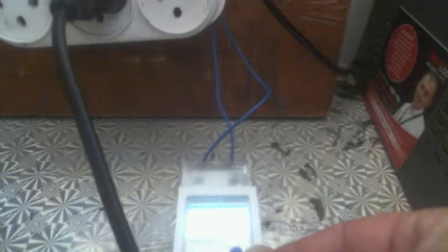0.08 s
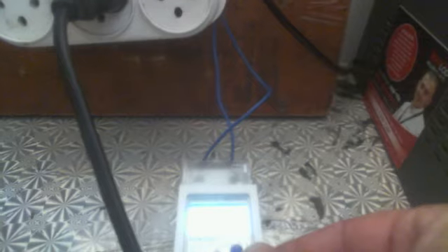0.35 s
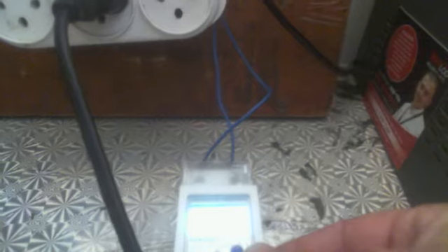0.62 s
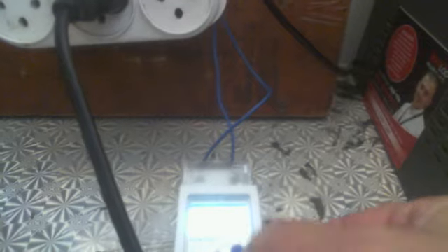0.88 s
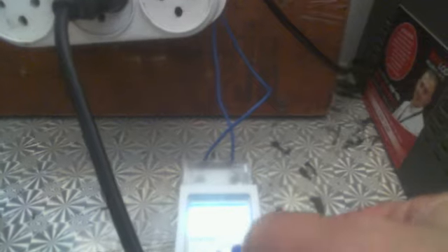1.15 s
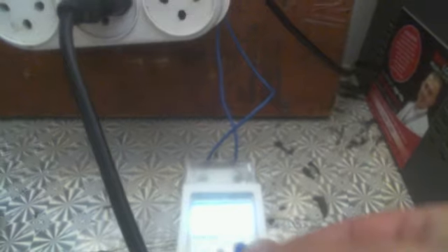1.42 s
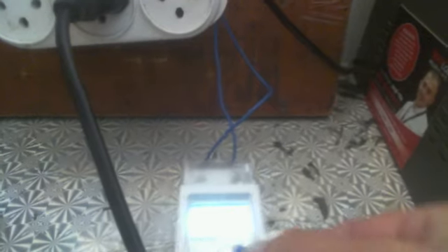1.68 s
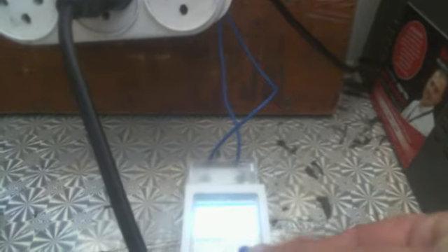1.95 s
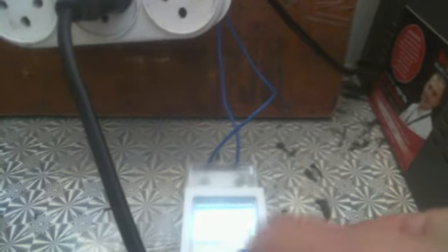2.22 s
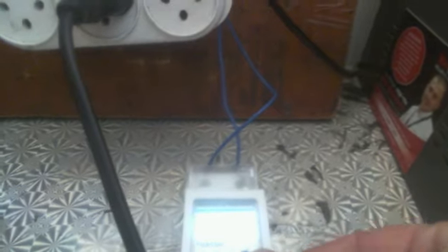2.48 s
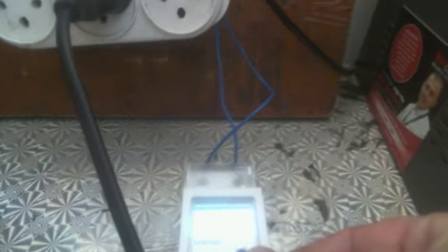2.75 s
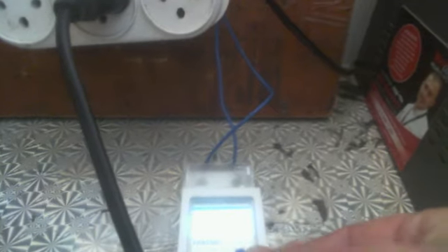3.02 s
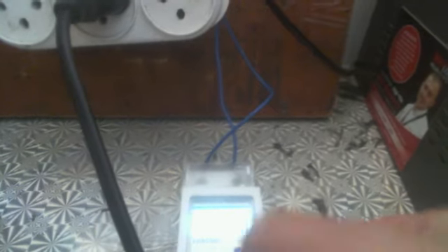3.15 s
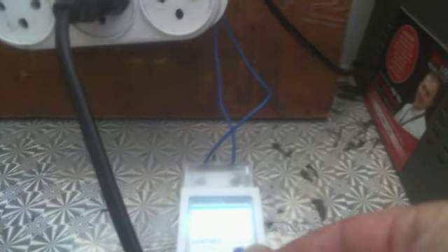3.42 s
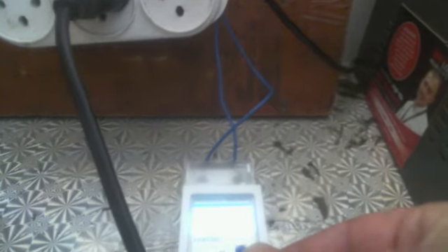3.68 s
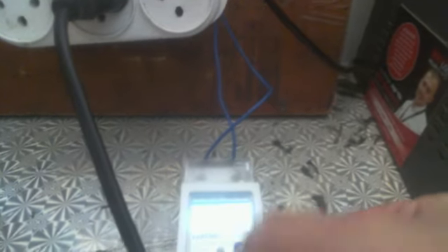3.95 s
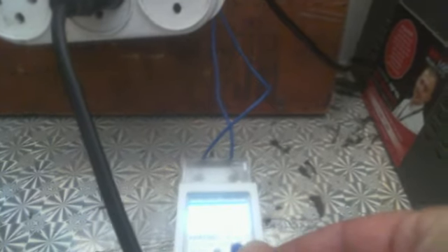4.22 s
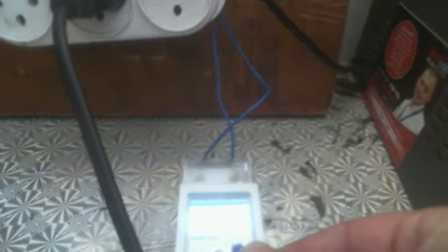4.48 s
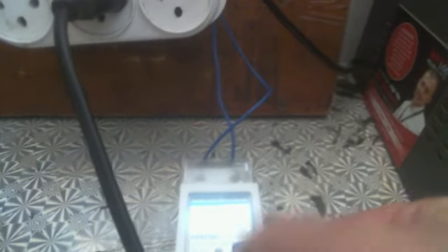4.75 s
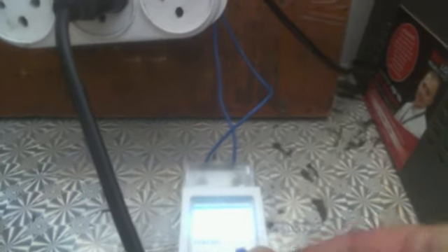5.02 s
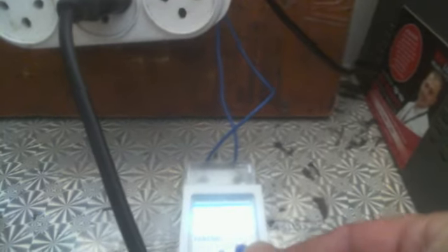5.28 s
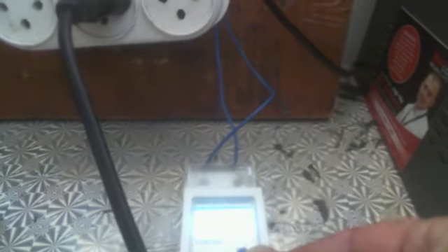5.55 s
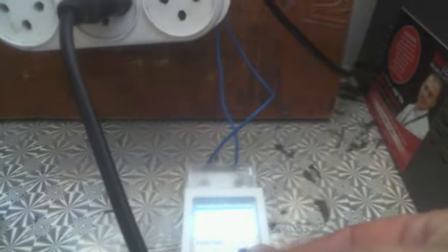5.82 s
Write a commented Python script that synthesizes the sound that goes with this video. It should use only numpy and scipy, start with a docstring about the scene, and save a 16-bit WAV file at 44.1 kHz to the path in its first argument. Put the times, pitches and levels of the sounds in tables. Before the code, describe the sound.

A steady low electrical hum and soft hiss fill a small room throughout, with a faint, thin high whine that breaks off briefly about seven times a second. At about 0.8 seconds a hand bumps the close, hand-held microphone, making a low thump and rumble that settle by about 1.4 seconds. At 1.8 seconds a small meter knocks softly and dully against the floor. Its plastic button is then pressed four times, at about 2.2, 3.2, 4.0 and 4.8 seconds. Each press is a short, bright click, followed roughly a fifth of a second later by a louder, slightly rounder snap as the button springs back. These clicks are the most prominent sounds, crisp and close with only a little room echo. A faint rumble of shifting grip passes around 3 seconds, and a last, softer microphone bump comes at about 5.6 seconds.

```python
"""A small energy meter is clicked close to a hand-held camera in a small room. From the start there is
a steady low hum, hiss, and a thin electronic whine that pauses at a regular beat. Near 1 s the hand bumps
the camera; at 1.8 s the finger knocks the meter against the floor. From 2.2 to 5.1 s it clicks the plastic
button four times: each press and release snaps the switch and rings the modes of the case.
A last, softer bump of the camera follows at 5.6 s."""
import sys
import numpy as np
from scipy import signal
from scipy.fft import rfft, irfft, next_fast_len
from scipy.io import wavfile
from scipy.ndimage import map_coordinates

SR = 44100
rng = np.random.default_rng(int(sys.argv[2]) if len(sys.argv) > 2 else 0)


def wrap_up_sound(samples):
    """Save the sound to the file named by the first command line argument, as 16-bit audio."""
    columns = np.atleast_2d(samples).T
    # keep every value between -1 and 1, then stretch to whole-number steps
    tamed = np.clip(columns, -1, 1)
    steps = np.round(tamed * 32767).astype(np.int16)
    wavfile.write(sys.argv[1], SR, steps)


N = 257852

# the switch snaps in: start_s, level_db
PRESSES = [(2.1936, -17.5), (3.204, -17.5), (4.0307, -17.5), (4.8481, -18)]
# the switch springs back: start_s, level_db
RELEASES = [(2.4397, -11), (3.4196, -9), (4.2259, -9), (5.0630, -9)]
# the fingertip touches the button lightly: start_s, level_db
TOUCHES = [(1.8335, -49.5), (2.3975, -43)]
# modes of the plastic case: pitch_hz, t60_s, press_db, release_db
CASE_MODES = [(450, 0.017, -16, -24.5), (719.3, 0.0201, -20.5, -20.5), (1094, 0.0338, -21, -27),
              (1460.7, 0.14, -66, -36.5), (1736, 0.0197, -47, -21.5), (2030.4, 0.0191, -22.5, -22),
              (2335.6, 0.01312, -3.5, -1), (2755.3, 0.0282, -8.5, -17.5), (3377, 0.00826, 2.5, -28.5),
              (3453, 0.0254, -6, -21), (3847.7, 0.0123, 6, 5.5), (4432, 0.0131, -0.5, -19),
              (4967, 0.01114, -1, -7), (6409, 0.012, 6, -5.5), (7150, 0.01, 2, -22.5),
              (8387, 0.0233, -11, -14.5), (8606, 0.01735, -12, -10.5), (9435, 0.0127, -10, -24.5),
              (12013, 0.0137, -10.5, -28), (13560, 0.0104, -9, -16.5)]
def button():
    """Impact excitation: press and release weight the same modes differently, one bright, one rounder."""
    going_in = [(hz, t60, db) for hz, t60, db, _ in CASE_MODES]
    coming_back = [(hz, t60, db) for hz, t60, _, db in CASE_MODES]
    press = snaps(PRESSES, going_in, rise_s=0.001784, travel_s=0.00415, damp_db=-5,
                  crack_db=-3.0, crack_t60=0.018, cutoff_hz=16100, near_db=-7.5, room_db=-16.5)
    release = snaps(RELEASES, coming_back, rise_s=0.002421, travel_s=0.00396, damp_db=-5,
                    crack_db=-4.0, crack_t60=0.01079, cutoff_hz=4430, near_db=-4.5, room_db=-15.5)
    touch = snaps(TOUCHES, coming_back, rise_s=0.00206, travel_s=0.0056, damp_db=-7,
                  crack_db=-0.5, crack_t60=0.0292, cutoff_hz=5000, near_db=-10.5, room_db=-3.5)
    return press + release + touch


# spectrum of the contact noise: frequency_hz, relative_density_db
CRACK_SPECTRUM = [(200, -25), (500, -22.5), (1050, -22), (1450, -16.5), (1850, -17), (2350, -6), (3100, -9),
                  (3800, -1.5), (5300, -9.5), (6600, -5.5), (8500, -15), (10000, -11), (13800, -22),
                  (16000, -25.5)]
def snaps(events, modes, rise_s, travel_s, damp_db, crack_db, crack_t60, cutoff_hz, near_db, room_db):
    """Snap-through buckling: ring and crack swell as the switch dome flips and are damped as it seats."""
    track, t = np.zeros(N), np.arange(SR // 3) / SR
    seated = 1 - 1 / (1 + (t / travel_s) ** 10)
    swell = (1 - np.exp(-(t / rise_s) ** 2)) * amp(damp_db * seated)

    def contact_noise():
        """Low-pass filtering: a short burst of contact noise, its treble rolled off above cutoff_hz."""
        burst = filtered(noise(CRACK_SPECTRUM, size=len(t)), lambda hz: 1 / np.hypot(1, hz / cutoff_hz))
        return unit(burst) * fade(t, crack_t60) * swell

    texture = contact_noise()  # the same parts meet in a similar way each time
    for start_s, db in events:
        crack = amp(crack_db) * (texture + 0.304 * contact_noise())
        ring = case_ring(modes, t) * swell
        sideways = 0.274 * ring + contact_noise()  # to the sides the case radiates a broader colour
        add(track, start_s, amp(db) * (ring + crack + reflections(sideways, near_db, room_db)))
    return track


def case_ring(modes, t, vary_db=2.0):
    """Modal superposition: the case rings as damped sines whose strengths vary from blow to blow."""
    hz, t60, db = np.transpose(modes)[:, :, None]
    strength = amp(db + vary_db * rng.standard_normal(hz.shape))
    sign = (-1) ** np.arange(len(hz))[:, None]  # neighbouring modes swing opposite ways
    return np.sum(sign * strength * np.sin(2 * np.pi * hz * t) * fade(t, t60), axis=0)


# the meter meets the floor: start_s, level_db
KNOCKS = [(1.8335, -34.5), (1.876, -47)]
# modes of the meter on the floor: pitch_hz, t60_s, level_db
FLOOR_MODES = [(214, 0.0935, 3), (287, 0.042, 1.5), (485, 0.039, -2.5), (594, 0.0191, 3.5),
               (760, 0.018, -23)]
def knocks(contact_s=0.001):
    """Damped free vibration: the meter rocks under the finger and thuds dully on the floor."""
    track, t = np.zeros(N), np.arange(SR // 3) / SR
    ring = sum(amp(db) * np.sin(2 * np.pi * hz * t) * fade(t, t60) for hz, t60, db in FLOOR_MODES)
    thud = ring * (1 - np.exp(-t / contact_s))
    for start_s, db in KNOCKS:
        add(track, start_s, amp(db) * (thud + reflections(thud, near_db=-12.5, room_db=-18.5)))
    return track


# shifts of grip, each length taken between its -20 dB points: peak_s, level_db, length_s
GRIP_SHIFTS = [(0.855, -26, 0.3424), (1.267, -38, 0.37), (2.99, -42.5, 0.01), (3.131, -43, 0.31),
               (3.886, -51.5, 1.06), (5.534, -44.5, 0.99)]
# bumps of the hand on the camera: peak_s, level_db, half_width_s
BUMPS = [(0.843, -21.5, 0.00186), (0.998, -34.5, 0.0041), (1.052, -31, 0.0158), (5.556, -31.5, 0.00528)]
# spectrum of the hand's rumble: frequency_hz, relative_density_db
RUMBLE_SPECTRUM = [(12, 19), (25, 0), (60, 6), (80, -2.5), (180, -21), (300, -65.5), (600, -110)]
def handling(rest_db=-60, rise_share=0.294, shudder_hz=62.6, shudder_t60=0.143, shudder_db=-7.5):
    """Structure-borne sound: shifts of grip rumble; bumps shake the camera like a mass on a spring."""
    t = np.arange(N) / SR
    grip = amp(rest_db)
    for peak_s, db, length_s in GRIP_SHIFTS:
        from_peak = np.maximum((peak_s - t) / rise_share, (t - peak_s) / (1 - rise_share)) / length_s
        grip = grip + amp(db - 20 * from_peak)
    pushes = sum(amp(db) / (1 + ((t - peak_s) / half_width_s) ** 2) for peak_s, db, half_width_s in BUMPS)
    spring = np.cos(2 * np.pi * shudder_hz * t) * fade(t, shudder_t60) * 2 * np.pi * shudder_hz / SR
    shudder = amp(shudder_db) * signal.fftconvolve(pushes, spring)[:N]
    return grip * noise(RUMBLE_SPECTRUM) + pushes + shudder


# tones of the machines: pitch_hz, rms_db
HUM_TONES = [(120, -59), (150, -68.5), (199.5, -63.5), (250, -61), (275, -68.5), (349, -72.5), (503, -74),
             (750, -73.5), (1443, -81.5)]
# spectrum of the room noise: frequency_hz, relative_density_db
AIR_SPECTRUM = [(12, 7.5), (25, -12), (45, -28.5), (65, -28.5), (87, -24.5), (110, -21), (135, -22),
                (171, -19), (196, -17), (256, -18), (376, -28), (509, -14.5), (582, -22.5), (736, -24.5),
                (860, -25.5), (1050, -46.5), (2400, -120)]
def hum(waver_db=1.79, drift_rad=0.375):
    """Forced vibration: mains-driven machines drone in slightly unsteady tones over soft room noise."""
    tones, t = np.zeros(N), np.arange(N) / SR
    for hz, db in HUM_TONES:
        strength = amp(db + waver_db * wobble(4.946))
        phase = 2 * np.pi * (hz * t + rng.random()) + drift_rad * wobble(4.72)
        tones += strength * np.sin(phase)
    return np.sqrt(2) * tones + amp(-45.5) * noise(AIR_SPECTRUM)


# tones of the whine while it sounds: pitch_hz, rms_db
WHINE_TONES = [(6750, -69), (8001, -76), (11375, -84), (12629, -91), (13500, -78)]
# spectrum of the hiss: frequency_hz, relative_density_db
HISS_SPECTRUM = [(590, -36), (1000, -1.5), (1200, 0), (1320, -2.5), (1480, -2.5), (2940, -6), (3500, -2.5),
                 (5700, -8), (6550, -4.5), (7100, -7.5), (8070, -7.5), (10700, -12.5), (13900, -11.5),
                 (16000, -12)]
def electronics(cycle_s=0.13325, pause_s=0.0226, ramp_s=0.00215):
    """Amplitude gating: a thin whine stops briefly in every cycle of the circuit, over steady hiss."""
    t = np.arange(N) / SR
    from_pause_s = np.abs((t / cycle_s + .5) % 1 - .5) * cycle_s
    gate = np.clip((from_pause_s - pause_s / 2) / ramp_s, 0, 1)
    whine = sum(amp(db) * np.sin(2 * np.pi * (hz * t + rng.random())) for hz, db in WHINE_TONES)
    return np.sqrt(2) * gate * whine + amp(-61.5) * noise(HISS_SPECTRUM)


# decay of reflections from the floor and furniture close by: frequency_hz, t60_s
NEAR_DECAY = [(500, 0.228), (2000, 0.053), (4000, 0.022), (7000, 0.0198), (12000, 0.0073)]
# decay of the room: frequency_hz, t60_s
ROOM_DECAY = [(300, 0.83), (3500, 0.215), (7000, 0.222), (13000, 0.102)]
def reflections(x, near_db, room_db):
    """Early reflections and reverberation: nearby surfaces answer first, then the room."""
    near = amp(near_db) * echoes(x, NEAR_DECAY, delay_s=0.003)
    room = amp(room_db) * echoes(x, ROOM_DECAY, delay_s=0.0052)
    return near + room


def echoes(x, decay, delay_s):
    """Diffuse field: x is convolved with a delayed noise tail, each frequency dying at its own rate."""
    hz, t, bands = signal.stft(rng.standard_normal(SR // 3), SR, nperseg=128)
    tail = signal.istft(bands * fade(t, along(decay, hz)[:, None]), SR, nperseg=128)[1]
    tail = np.pad(tail, (round(delay_s * SR), 0))
    return signal.fftconvolve(x, tail / np.linalg.norm(tail))[:len(x)]


def amp(db):
    """Decibels to amplitude gain."""
    return 10 ** (np.asarray(db) / 20)


def unit(x):
    """Normalisation to rms 1."""
    return x / np.sqrt(np.mean(x ** 2) + 1e-20)


def along(points, hz):
    """Interpolation of (frequency_hz, value) points on a log frequency axis."""
    frequencies, values = np.transpose(points)
    return np.interp(np.log(hz + 1), np.log(frequencies + 1), values)


def filtered(x, response):
    """Linear filtering: the spectrum of x times a frequency response."""
    size = next_fast_len(len(x) + SR // 4)
    return irfft(rfft(x, size) * response(np.fft.rfftfreq(size, 1 / SR)), size)[:len(x)]


def noise(spectrum, size=N):
    """Spectral shaping: coloured noise of rms 1."""
    return unit(filtered(rng.standard_normal(size), lambda hz: amp(along(spectrum, hz))))


def wobble(rate_hz):
    """Random modulation: a smooth curve through rate_hz knots a second."""
    knots = rng.standard_normal(int(N * rate_hz / SR) + 4)
    return map_coordinates(knots, [np.arange(N) * rate_hz / SR])


def fade(t, t60):
    """Exponential decay of 60 dB in t60 seconds."""
    return np.exp(-np.log(1000) * t / t60)


def add(track, start_s, sound):
    """Mix a sound into the track at start_s."""
    part = track[round(start_s * SR):][:len(sound)]
    part += sound[:len(part)]


def scene():
    """Superposition: all sources sum at the one microphone."""
    return (button() + knocks() + handling() + hum() + electronics())[None]


TOP_HZ = 16050
def record(dry):
    """Band limiting: the camera keeps nothing above TOP_HZ."""
    return np.array([filtered(channel, lambda hz: hz < TOP_HZ) for channel in dry])


dry = scene()
out = record(dry)
wrap_up_sound(out)
```